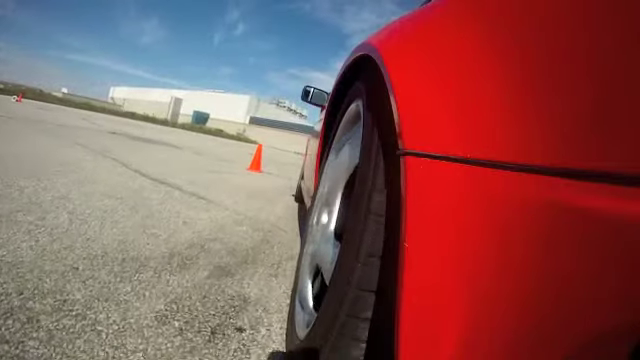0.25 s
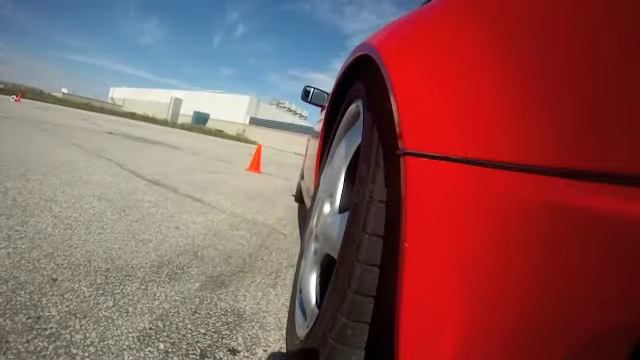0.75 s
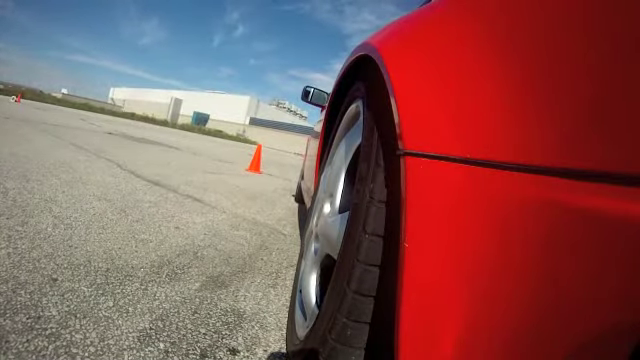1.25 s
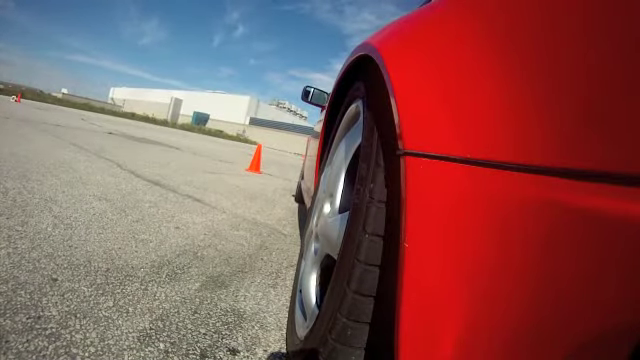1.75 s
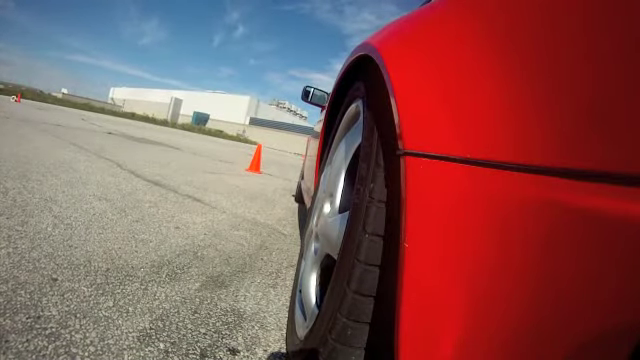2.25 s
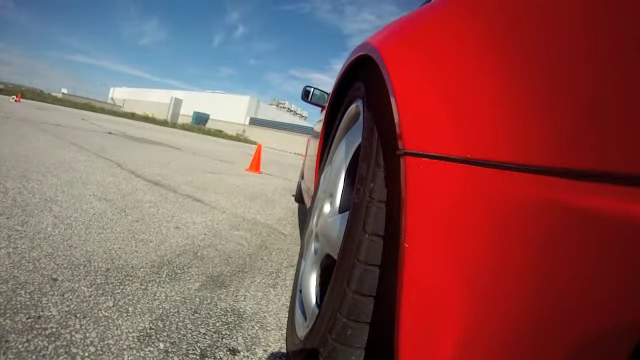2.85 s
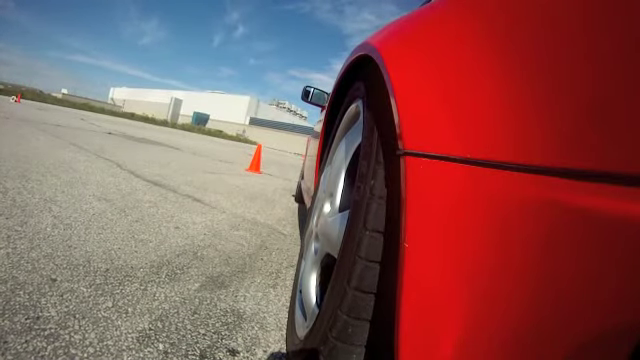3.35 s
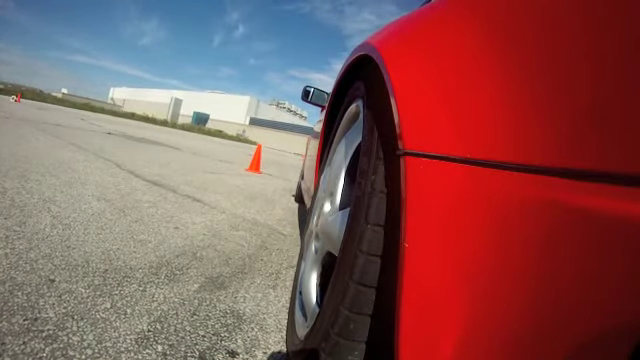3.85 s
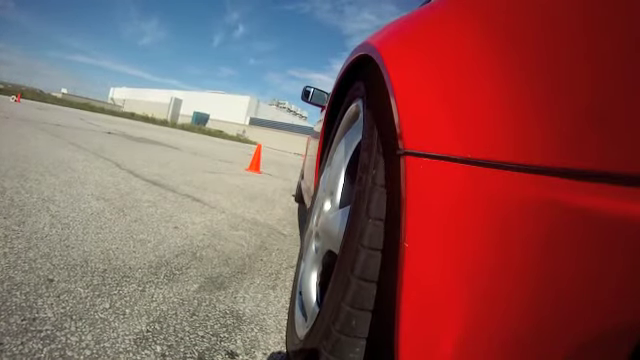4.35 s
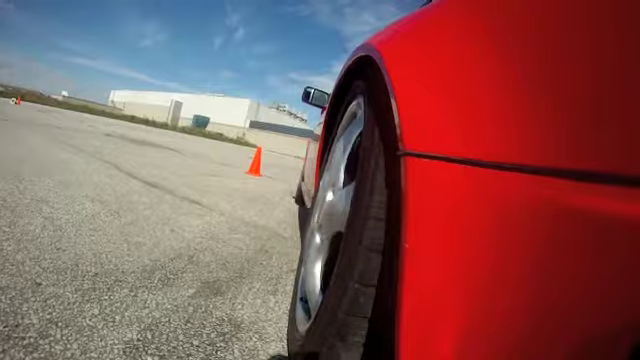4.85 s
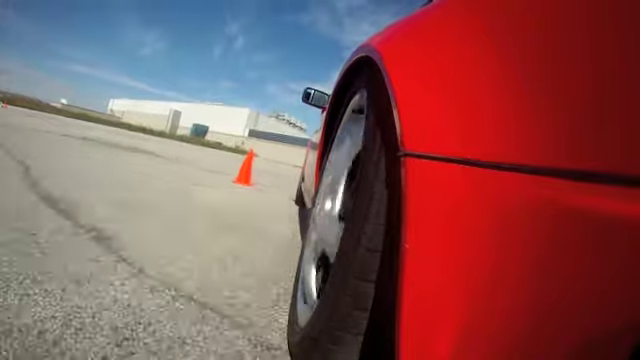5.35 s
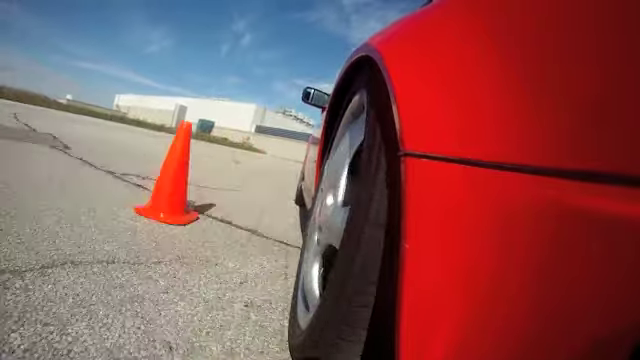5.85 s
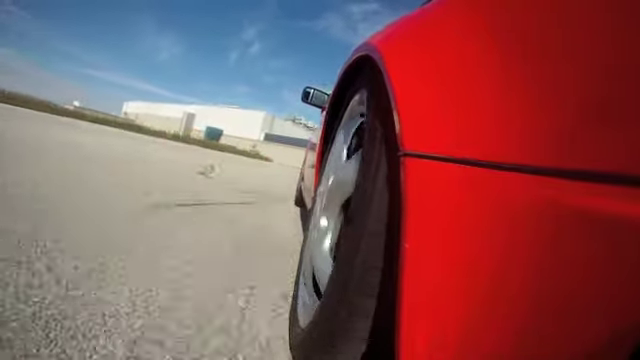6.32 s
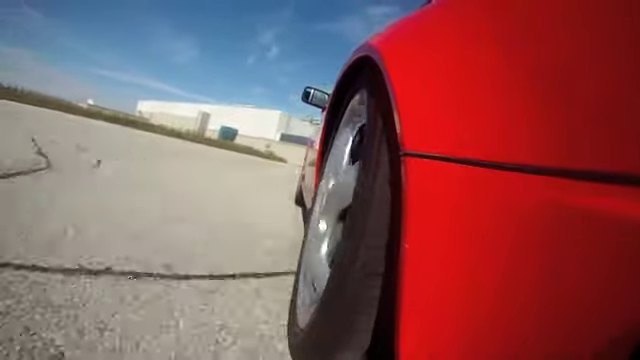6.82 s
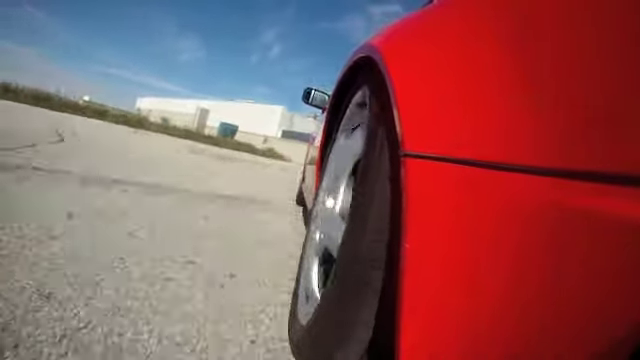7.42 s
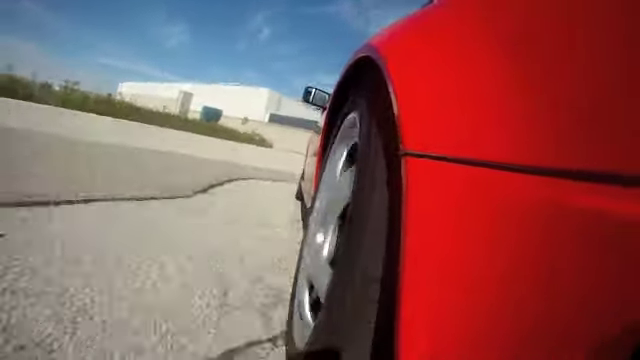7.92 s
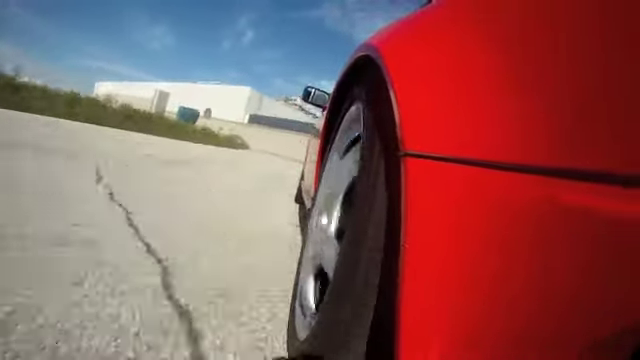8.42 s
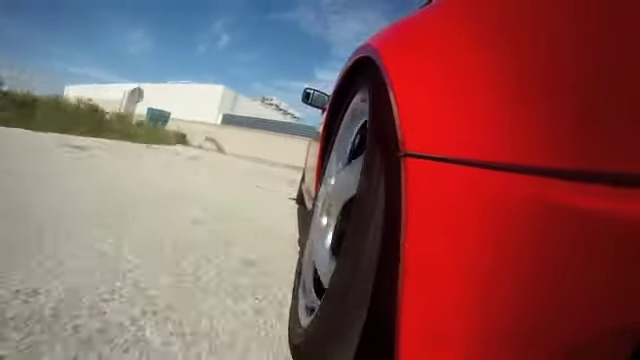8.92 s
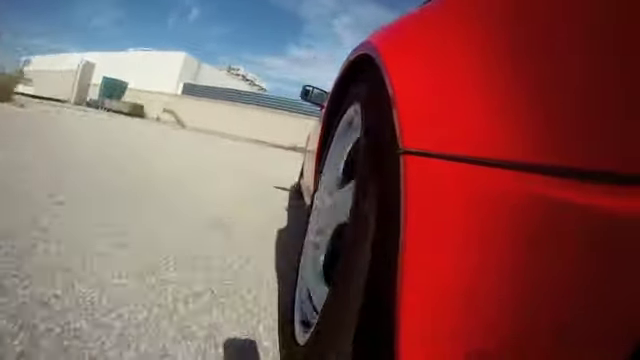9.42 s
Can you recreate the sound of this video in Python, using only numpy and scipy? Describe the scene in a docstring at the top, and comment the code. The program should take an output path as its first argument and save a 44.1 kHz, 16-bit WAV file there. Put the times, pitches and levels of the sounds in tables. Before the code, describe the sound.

Heard from a microphone beside the front wheel, a sports car sits on an open paved lot with a rough, throbbing idle. After two quick throttle blips it stumbles, moves off and climbs to high revs, the exhaust booming and rasping over ticking valves and a rushing fan. The revs then drop to a steady drone, joined by a few brief knocks from the wheel arch and a low gust of wind.

```python
"""First you hear a lumpy idle: an air-cooled flat-six engine. It stumbles as the clutch bites, pulls away,
revs high, then slows with the throttle shut. Each firing pushes gas down the exhaust, which booms and
rasps, while the valves tick and the fan rushes. Later, grit knocks in the wheel arch and a gust blows by.
We listen from a camera by the front wheel. Its limiter turns the sound down after the heaviest beats,
and its converter mirrors the bass faintly into the treble."""
import sys
import numpy as np
from scipy import signal
from scipy.fft import rfft, irfft, next_fast_len
from scipy.io import wavfile
from scipy.ndimage import uniform_filter1d, map_coordinates

SR = 44100
rng = np.random.default_rng(int(sys.argv[2]) if len(sys.argv) > 2 else 0)


def output_pcm(signal):
    """Save a mono or channel-first signal as 16-bit PCM at the path in sys.argv[1].

    Samples are clipped to [-1, 1] before scaling.
    """
    pcm = np.clip(np.atleast_2d(signal).T, -1, 1) * 32767
    wavfile.write(sys.argv[1], SR, np.round(pcm).astype(np.int16))


N = 426888
T = np.arange(N) / SR


def amp(db):
    """Turn decibels into a gain."""
    return 10 ** (np.asarray(db) / 20)


def steady(x):
    """Even out slow changes in loudness but keep the quick beats."""
    power = uniform_filter1d(uniform_filter1d(x * x, SR // 8), SR // 12)
    return x / np.sqrt(np.abs(power) + 1e-20)


def blend(clean, noisy, share):
    """Make two sounds equally loud, then mix them; share (0 to 1) is the noisy one's gain."""
    share = np.clip(share, 0, 1)
    return np.sqrt(1 - share ** 2) * steady(clean) + share * steady(noisy)


def wobble(rate):
    """A smooth curve through `rate` random values a second."""
    return map_coordinates(rng.standard_normal(int(N * rate / SR) + 4), [T * rate])


def swell(middle, half):
    """A smooth hump of height 1; its middle and half length are in seconds."""
    return np.exp(-((T - middle) / half) ** 2)


def filtered(x, response):
    """Filter x; response gives the gain and phase at each frequency."""
    size = next_fast_len(N + SR // 2)
    return irfft(rfft(x, size) * response(np.fft.rfftfreq(size, 1 / SR)), size)[:N]


def coloured(x, points):
    """Shape the tone of x with a curve through (Hz, dB) points."""
    hz, db = np.transpose(points)
    return filtered(x, lambda f: amp(np.interp(np.log(f + 1), np.log(hz), db)))


def resonate(x, modes):
    """Let x ring a set of (Hz, width in Hz, dB) resonances, with alternating signs."""
    return filtered(x, lambda f: sum(
        (-1) ** k * amp(db) * 1j * f * width / (hz * hz - f * f + 1j * f * width)
        for k, (hz, width, db) in enumerate(modes)))


def pulses(times, sizes):
    """A click at each time, shared between the two nearest samples."""
    at = np.clip(times * SR, 0, N - 2)
    i = at.astype(int)
    return np.bincount(i, sizes * (1 - at + i), N) + np.bincount(i + 1, sizes * (at - i), N)


def drone(turns, levels, rough):
    """Two low tones, at the bank rate and at twice that, waver when the fuel burns unevenly."""
    tones = [amp(db + 0.83 * rough * wobble(26)) * np.sin(2 * np.pi * k * turns)
             for k, db in enumerate(levels, 1)]
    return np.sqrt(2) * amp(0.03) * sum(tones)


# The cylinders in firing order. Each row: lateness in gaps between firings, low push, rasp strength.
CYLINDERS = [(0.016, 1.51, 0.32), (-0.164, 0.15, 0.75), (0.1136, 0.81, 0.46), (0.0485, 0.71, 0.39),
             (0.089, 0.9, 0.47), (-0.1473, 0.15, 0.44)]
# Notes the exhaust rings at. Each row: pitch in Hz, width in Hz, level in dB.
SILENCER_NOTES = [(72.3, 68, -7), (119.8, 35, 7), (166, 21, 3.5), (180.5, 20.8, -3)]
GROWL_NOTES = [(256, 90, 2), (296.5, 88, 4), (341.4, 85, -2)]
THROAT_NOTES = [(197, 26.4, 7.5)]
# Tone curves for those notes. Each row: frequency in Hz, level in dB.
SILENCER_TONE = [(20, -20), (60, 11), (100, -3), (180, 3), (250, 1), (420, -12.5), (700, -30), (1500, -80)]
GROWL_TONE = [(60, 4), (200, -5.5), (370, 3.5), (480, -45), (800, -66), (1500, -80)]


def lope(turns, bank_hz, rasp_db, rough, harmonics=36):
    """Unequal cylinders push gas through the silencer in a limping beat, called a lope."""
    late, push, _ = np.transpose(CYLINDERS)
    six = len(CYLINDERS)
    spectrum = np.exp(-2j * np.pi * np.outer(np.arange(harmonics), np.arange(six) + late) / six) @ push
    spectrum[[0, six // 2, six]] = 0  # leave out the constant part and the drone's two tones
    cycle = irfft(spectrum, harmonics ** 2)
    pattern = np.interp(2 * turns / six, np.arange(len(cycle)) / len(cycle), cycle, period=1)
    times = np.interp(np.arange(int(2 * turns[-1])), 2 * turns, T)
    stumbles = pulses(times, rng.standard_normal(len(times)))
    flow = amp(-0.5 + 22 * np.log2(bank_hz / 85))  # faster gas wakes the growl
    opening = amp(0.77 * (rasp_db + 22))  # the throaty note opens under load

    def silencer(x):
        boom = coloured(resonate(x, SILENCER_NOTES), SILENCER_TONE)
        growl = flow * resonate(x, GROWL_NOTES) + opening * resonate(x, THROAT_NOTES)
        return boom + coloured(growl, GROWL_TONE)

    return blend(silencer(pattern), silencer(stumbles), rough)


def metal_ring(x, ring_s, size=2048):
    """The metal of the engine bay smears each blow into a short, dense ring."""
    spectrum = rfft(rng.standard_normal(size) * amp(-60 * T[:size] / ring_s))
    ring = irfft(spectrum / np.sqrt(np.abs(spectrum)))[:size // 2]
    return signal.fftconvolve(x, ring)[:N]


# Tailpipe notes; hot gas wakes the second set. Each row: pitch in Hz, width in Hz, level in dB.
PIPE_NOTES = [(417, 47, 1.5), (468, 21, 9.5), (504.7, 61.4, 5), (558.8, 59.5, -0.5)]
HOT_PIPE_NOTES = [(573.4, 63, -1.5)]
# Tone curves of the rasp and the brighter bark. Each row: frequency in Hz, level in dB.
RASP_TONE = [(60, -30), (200, -9), (300, -4.5), (600, -8.5), (680, -7.5), (800, -35), (1500, -40),
             (4000, -80)]
BARK_TONE = [(500, -37), (800, -8), (980, 2.5), (1130, 4), (1350, -5), (1650, -4), (2200, -8.5),
             (3000, -5.5), (4000, -24.5)]


def exhaust(turns, rough, contrast, rasp_db, bark_db, puff_s=0.006):
    """Each firing strikes the tailpipe with a sharp blow and drags a puff of swirling gas behind it."""
    firing = np.arange(int(2 * turns[-1]))
    late, _, strength = np.array(CYLINDERS)[firing % len(CYLINDERS)].T
    times = np.interp(firing + late, 2 * turns, T)
    strength = np.abs(strength) ** np.interp(times, T, contrast)
    slop, force = rng.standard_normal((len(firing), 2)).T * np.interp(times, T, rough)
    blows = pulses(times + 0.00025 * slop, strength * amp(4 * force))
    tails = signal.lfilter([1], [1, -np.exp(-1 / (puff_s * SR))], blows)
    puffs = tails * rng.standard_normal(N)
    heat = amp(rasp_db + 20.5)

    def tailpipe(x):
        return coloured(resonate(x, PIPE_NOTES) - heat * resonate(x, HOT_PIPE_NOTES), RASP_TONE)

    rasp = blend(tailpipe(blows), tailpipe(puffs), rough)
    clangs = metal_ring(blows, ring_s=0.079)
    bark = blend(coloured(clangs, BARK_TONE), coloured(puffs, BARK_TONE), rough)
    return amp(rasp_db + 0.1) * rasp + amp(bark_db - 5) * bark


# Tone curve of the valves and rushing air. Each row: frequency in Hz, level in dB.
MACHINE_TONE = [(200, 10.5), (800, -3), (960, -10.5), (1080, -3.5), (1400, -1.5), (2000, -4), (2500, -1.5),
                (3100, 0), (3700, -6), (4300, -13), (5200, -10), (7000, -13), (7800, -17), (8400, -11),
                (9300, -9), (10400, -19), (13500, -19.5), (15000, -12.5)]
# Notes of the fan housing. Each row: pitch in Hz, width in Hz, level in dB.
FAN_NOTES = [(942, 32, 3), (1405, 50, -5), (2460, 116, -4.5)]


def valves_and_fan(turns, level_db, valves=12):
    """The valves tick in a loose pattern each engine cycle, over the rush of fan and tyres."""
    cycles = 2 * turns / len(CYLINDERS)
    tick = np.arange(int(valves * cycles[-1]))
    late, size = rng.standard_normal((valves, 2))[tick % valves].T  # each valve has its own habit
    slop, force = rng.standard_normal((len(tick), 2)).T  # and each tick strays from it
    times = np.interp(tick + 0.2 * late + 0.12 * slop, valves * cycles, T)
    ticks = metal_ring(pulses(times, amp(2.7 * size + 1.9 * force)), ring_s=0.064)
    firing_beat = (0.5 + 0.5 * np.cos(4 * np.pi * turns)) ** 4
    air = (1 + 0.1 * firing_beat * amp(4.4 * wobble(65))) * rng.standard_normal(N)
    rush = coloured(air, MACHINE_TONE) + resonate(air, FAN_NOTES)
    mix = blend(coloured(ticks, MACHINE_TONE), rush, share=0.68)
    return amp(level_db + 6 + 1.01 * wobble(22)) * mix


# Tone curve of the low rumble. Each row: frequency in Hz, level in dB.
RUMBLE_TONE = [(15, -23), (30, -6), (45, 2), (80, -2.5), (150, 1.5), (400, -72), (1000, -90)]


def rumble(level_db):
    """A low, lumpy rumble of the engine, strongest off the throttle; the late gust uses the same tone."""
    gain = amp(level_db + 1.1 * wobble(20))
    noise = coloured(rng.standard_normal(N), RUMBLE_TONE)
    return gain * noise / np.sqrt(np.mean(noise ** 2) + 1e-20)


# Quieter moments. Each row: middle in seconds, half length in seconds, change in dB.
DIPS = [(2.293, .19, -3.5), (4.775, 0.054, -3), (7.88, 0.056, -4)]


def dips():
    """A gain that makes the engine's sound dip briefly."""
    return amp(sum(db * swell(s, half) for s, half, db in DIPS))


def surge(bank_hz, most_db=6.5, octaves_per_s=3.5):
    """The exhaust barks while the revs leap: returns the extra dB."""
    climb = uniform_filter1d(np.gradient(np.log2(bank_hz)) * SR, SR // 6)
    return most_db * np.tanh(np.maximum(climb, 0) / octaves_per_s)


# Heavy single firings. Each row: middle in seconds, peak level in dB, pitch in Hz.
THUMPS = [(3.598, -2, 121), (3.666, 1, 61.7), (3.727, -5, 122), (3.742, -3.5, 69), (3.852, -6, 143),
          (4.41, -4.5, 117)]


def thumps():
    """A heavy firing is one low push of gas."""
    return sum(amp(db) * np.cos(2 * np.pi * hz * (T - s)) * swell(s, 0.42 / hz) for s, db, hz in THUMPS)


# Brighter and duller moments. Each row: middle in seconds, half length in seconds,
# change of valves and fan in dB, change of bark in dB.
TREBLE_SWELLS = [(3.78, 0.042, -2.5, 3), (4.47, .06, -1.5, 5), (5.648, 0.21, -1.5, -2),
                 (5.987, .11, 2.5, 10), (7.683, 0.075, 4, -3), (8.595, 0.23, 3, 4.5),
                 (8.952, 0.14, -2.5, -2.5)]


def treble_swells():
    """The treble swells and sinks: returns dB changes for the valves and fan, and for the bark."""
    machine_db = sum(db * swell(s, half) for s, half, db, _ in TREBLE_SWELLS)
    bark_db = sum(db * swell(s, half) for s, half, _, db in TREBLE_SWELLS)
    return machine_db, bark_db


# Spells of popping. Each row: middle in seconds, half length in seconds, extra rasp in dB,
# extra contrast between strong and weak cylinders.
POPPING = [(3.83, 0.04, 3.5, 0), (4.154, 0.12, 4.5, 0), (5.304, 0.31, 7, 0.14), (6.247, .09, 4, 0.76),
           (8.312, .14, 8, 1.2)]


def popping():
    """The exhaust pops harder as the rasp grows and the strong cylinders stand out."""
    rasp_db = sum(db * swell(s, half) for s, half, db, _ in POPPING)
    contrast = 1 + sum(more * swell(s, half) for s, half, _, more in POPPING)
    return rasp_db, contrast


def coasting(turns, bank_hz, coast, boom_db=-17, upper_db=-16.5):
    """With the throttle shut the cylinders push unevenly: a boom, with a second low tone above it."""
    ratio = 8 / len(CYLINDERS)  # four waves per engine cycle
    pass_hz, pass_octaves = 147, 0.45  # the silencer lets the upper tone through around here
    passed = np.exp(-(np.log2(ratio * bank_hz / pass_hz) / pass_octaves) ** 4)
    upper = passed * amp(upper_db + wobble(9.2)) * np.sin(2 * np.pi * ratio * turns)
    boom = amp(boom_db) * np.sin(2 * np.pi * turns)
    return np.sqrt(2) * coast * (boom + upper)


# Hits on the wheel arch. Each row: start in seconds, relative level in dB.
KNOCKS = [(6.276, -24), (8.438, -19), (9.225, -18), (9.305, -12), (9.611, -17)]
# Notes the arch rings at. Each row: pitch in Hz, width in Hz, level in dB.
ARCH_NOTES = [(323, 96, 10), (533, 68, 12), (960, 170, 2), (1530, 420, -5), (2800, 1200, -14)]


def knocks(fade_s=0.14):
    """Bumps and grit briefly rattle the wheel arch."""
    bursts = sum(amp(db - 60 * np.abs(T - s) / fade_s) * (T >= s) for s, db in KNOCKS)
    return amp(6.5) * resonate(bursts * rng.standard_normal(N), ARCH_NOTES)


def gust(start_s=9.1, rise_s=0.087, level_db=-19.5, fade_db_per_s=7):
    """As the car turns, one gust of wind hits the camera quickly and eases off."""
    age = np.maximum(T - start_s, 0)
    return np.minimum(age / rise_s, 1) * rumble(level_db - fade_db_per_s * age)


# Engine speed: idle, two blips, pull away, climb, slow down, cruise. Each row: time in seconds,
# bank rate in Hz (how often one bank, a side of three cylinders, fires).
SPEED = [(0, 25.15), (3.48, 25.2), (3.73, 32), (3.86, 51), (4.08, 40), (4.2, 28.4), (4.38, 29.5),
         (4.57, 74), (4.78, 60.5), (4.98, 64.6), (5.12, 55.5), (5.48, 52.6), (5.79, 45.7), (5.9, 55.6),
         (6.3, 71.5), (6.48, 80), (7.19, 111.8), (7.53, 128), (7.63, 142), (7.72, 144.5), (7.96, 121),
         (8.4, 86.5), (8.62, 79.5), (8.76, 82.3), (9.05, 82.4), (9.68, 77.5)]
# How hard the engine works. Each row: time in seconds, load (1 full throttle, 0 idling, -1 coasting).
LOAD = [(3.7, 0), (3.8, 0.68), (3.9, -0.034), (4.08, -0.85), (4.2, 0.04), (4.4, 0), (4.49, 1),
        (4.66, -0.94), (4.78, -0.66), (4.88, 0.078), (5.2, 0.46), (5.75, 0.61), (6.1, 0.67), (7.8, 1),
        (7.92, -1.01), (8.35, -0.68), (8.53, -0.23), (8.62, 0.61), (8.95, 0.55), (9.2, -0.27),
        (9.68, -0.38)]
# The mix with no load. Each row: bank rate in Hz, then relative levels in dB for the bank tone,
# firing tone, lope, rasp, bark, valves and fan, and rumble.
LEVELS_BY_SPEED = [(27, -62, -19.5, -20.5, -32.5, -55, -39, -20.5),
                   (32.5, -33, -23.5, -15.5, -29.5, -60, -35, -15.5),
                   (49.3, -34, -25.5, -20, -28.5, -42.5, -38, -23.5),
                   (61, -22, -18, -21, -26, -41.5, -36, -18.5),
                   (83, -22, -18.5, -26.5, -26, -34.5, -36, -23),
                   (103.3, -18.5, -23, -24, -24.5, -30, -32, -22.5),
                   (153.6, -14, -22.5, -26, -25.5, -27, -25, -24)]
# Changes in dB to those seven layers, in the same order, at full throttle and when coasting.
PULL_DB = (-1, 4, 3.5, 6, -1.5, -3, -18)
COAST_DB = (-15.5, -12, -7, -0.5, 2.5, 0, -1.5)


def scene():
    """One speed and one load drive the engine's layers; the knocks and the gust go on top."""
    bank_hz = np.interp(T, *np.transpose(SPEED))
    load = np.interp(T, *np.transpose(LOAD))
    pull, coast = np.clip(load, 0, 1), np.clip(-load, 0, 1)
    row_hz, *layers = np.transpose(LEVELS_BY_SPEED)
    bank_db, firing_db, lope_db, rasp_db, bark_db, machine_db, rumble_db = [
        np.interp(np.log(bank_hz), np.log(row_hz), db) + pull_db * pull + coast_db * coast
        for db, pull_db, coast_db in zip(layers, PULL_DB, COAST_DB)]
    machine_swell_db, bark_swell_db = treble_swells()
    pop_db, contrast = popping()
    machine_db += machine_swell_db
    bark_db += surge(bank_hz) + bark_swell_db
    rasp_db += pop_db
    # how unevenly the fuel burns, from 0 to 1: worst at idle
    rough = 0.482 * (1 - pull - coast) + 0.12 * pull + 0.188 * coast
    # counts one bank's firings, so 2 * turns counts them all
    turns = np.cumsum(bank_hz * (1 + 0.006 * rough * wobble(14))) / SR
    engine = drone(turns, [bank_db, firing_db], rough)
    engine += amp(lope_db) * lope(turns, bank_hz, rasp_db, 0.73 * rough)
    engine += coasting(turns, bank_hz, coast) + thumps() + rumble(rumble_db)
    engine += exhaust(turns, rough, contrast, rasp_db, bark_db)
    engine += valves_and_fan(turns, machine_db)
    return (dips() * engine + gust() + knocks())[None]


def limiter(x, ceiling_db, recovery_db_per_s):
    """The volume drops at each peak over the ceiling, then climbs back."""
    over_db = np.maximum(0, 20 * np.log10(np.abs(x) + 1e-9) - ceiling_db)
    cut_db = np.maximum.accumulate(over_db + recovery_db_per_s * T) - recovery_db_per_s * T
    return x * amp(-uniform_filter1d(cut_db, SR // 300))


def record(dry):
    """The camera limits peaks, mirrors bass into the treble, and cuts a narrow band and both extremes."""
    bottom_hz, notch_hz, mirror_hz, top_hz = 22, 6000, 12000, 15330
    x = limiter(amp(-0.48) * dry[0], ceiling_db=-5.5, recovery_db_per_s=42)
    bass = filtered(x, lambda f: 1j * f / 500 / (1 + (f / 680) ** 8))
    x = x + amp(-20.5) * bass * np.cos(2 * np.pi * mirror_hz * T)
    notch = lambda f: amp(-18 * np.exp(-np.abs((f - notch_hz) / 450) ** 3))
    low_cut = lambda f: 1 - np.exp(-(f / bottom_hz) ** 2)
    return filtered(x, lambda f: low_cut(f) * notch(f) * (f < top_hz))[None]


dry = scene()
out = record(dry)
output_pcm(out)
```